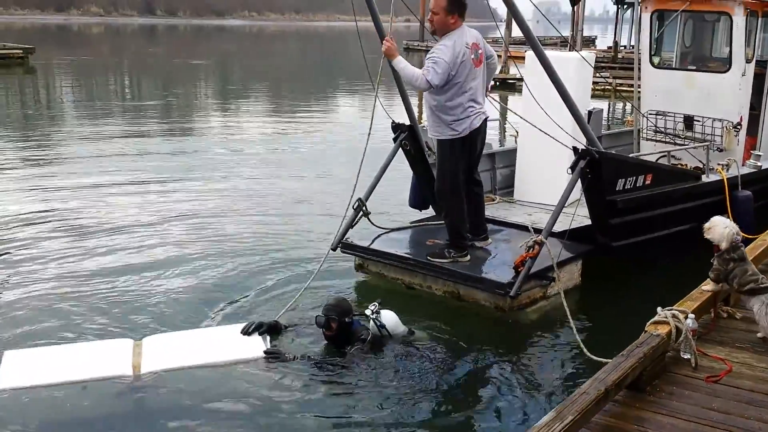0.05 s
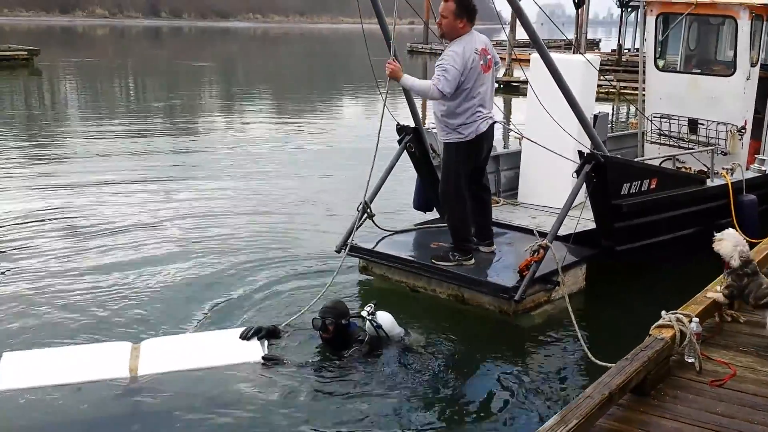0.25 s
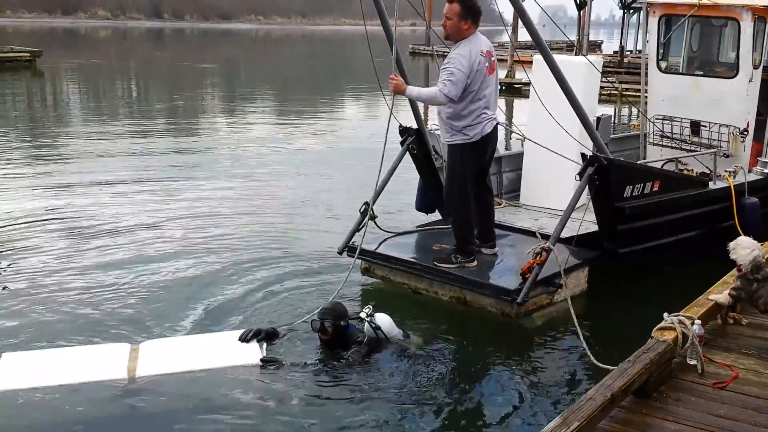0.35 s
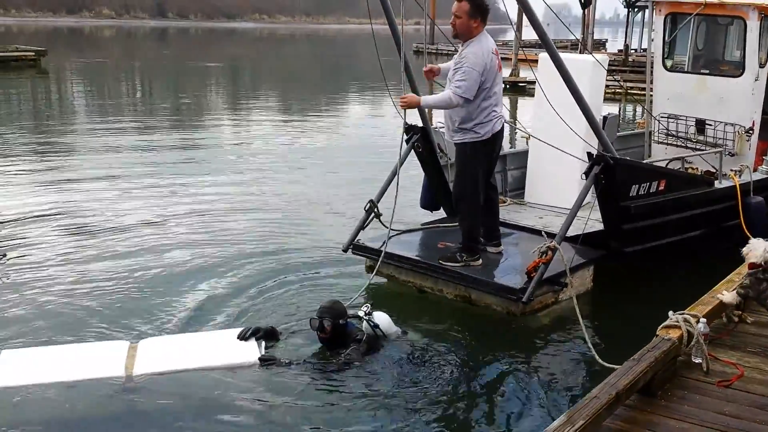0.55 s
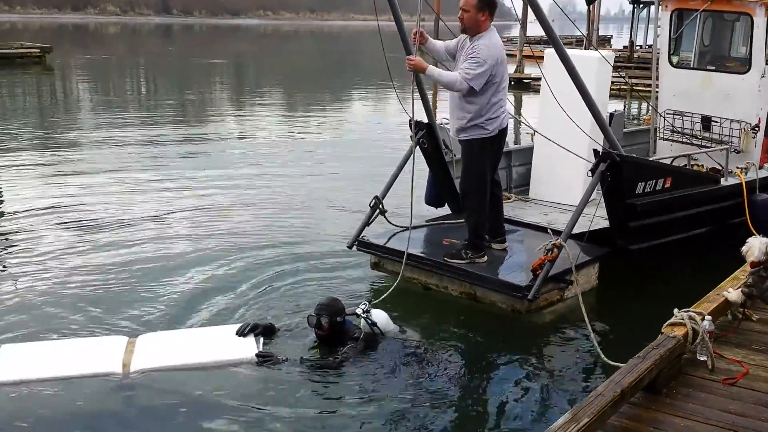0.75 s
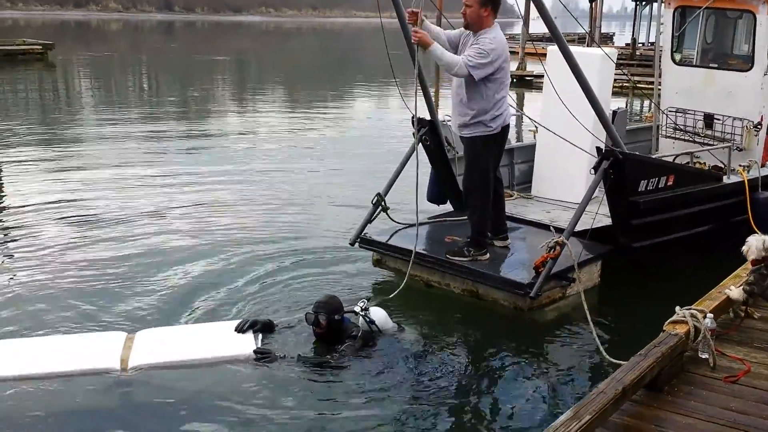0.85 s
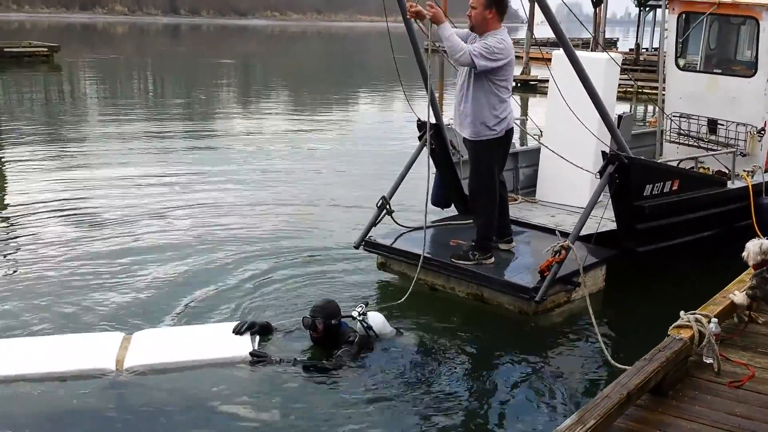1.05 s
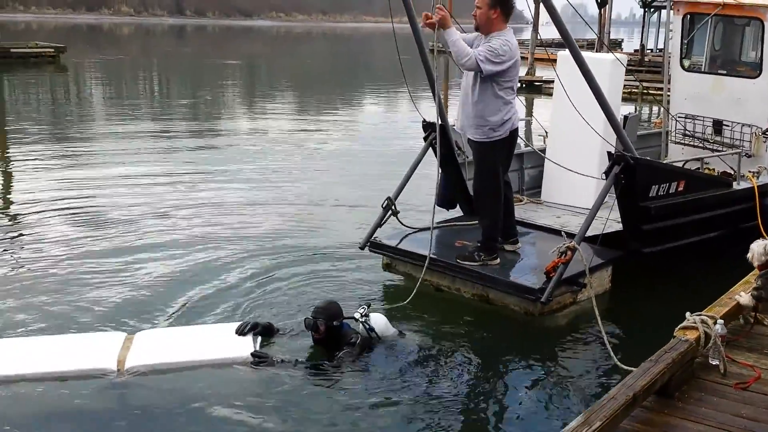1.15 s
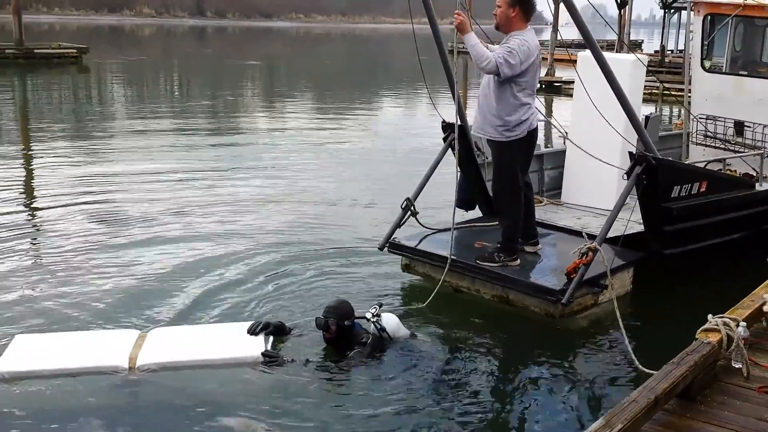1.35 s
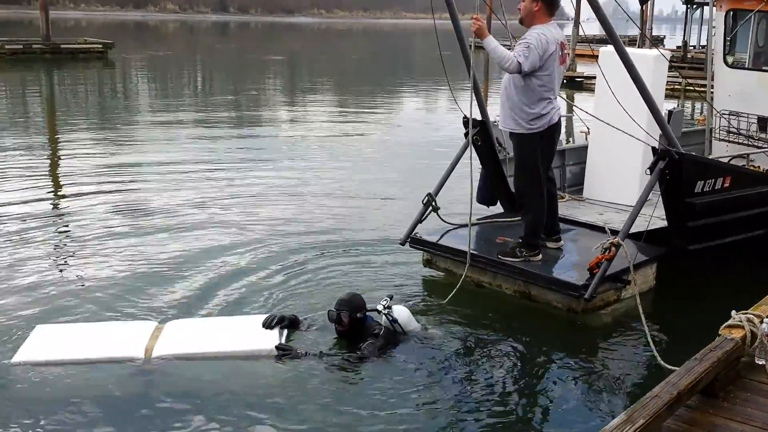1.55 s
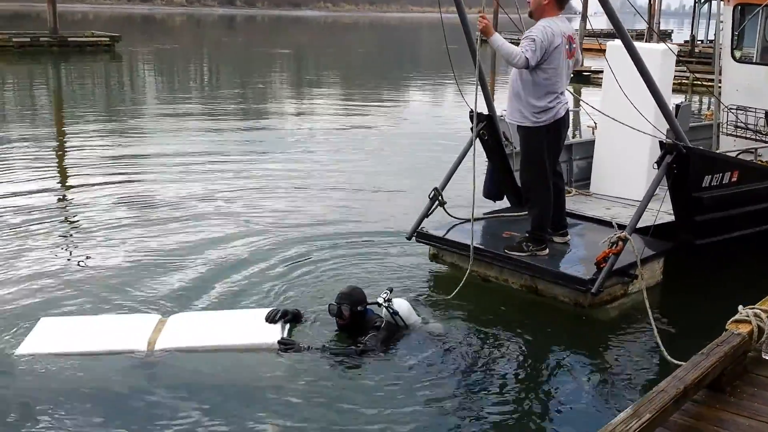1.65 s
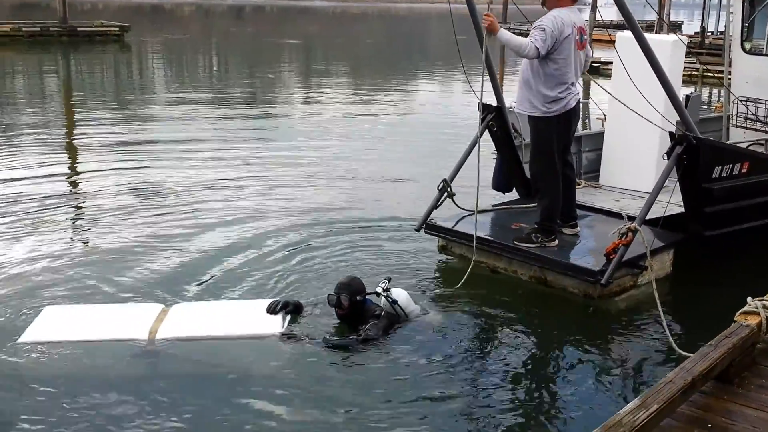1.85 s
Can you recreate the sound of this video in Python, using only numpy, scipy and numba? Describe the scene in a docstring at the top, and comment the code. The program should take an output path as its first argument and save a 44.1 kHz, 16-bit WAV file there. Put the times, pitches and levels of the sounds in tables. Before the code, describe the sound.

A small dog barks harshly close by at about 0.2 s, a short raspy yap that rises and falls, followed by hard echoes and a fading open-air tail. Around 0.75 to 1.0 s claws scrape, pads rub and planks thud softly, with tiny water plips. A second, slightly higher and rougher bark comes at 1.35 to 1.55 s, then light board thuds and a tick over quiet water wash and faint motor hum.

```python
"""A small dog gives two harsh barks on a wooden dock, close to the microphone.
Uneven throat pulses and rasp ring its chest, mouth and muzzle; boat hulls and the far side of the
marina throw the sound back as hard echoes and scatter. Claws scuff and pads rub the planks, the boards
thud and small fittings tick. Behind lie filtered-noise wash and fizz of water, two ringing plips,
a wavering motor hum and faint air on the microphone ports."""
import sys
import numpy as np
from scipy import signal
from scipy.fft import rfft, irfft
from scipy.io import wavfile
from scipy.ndimage import uniform_filter1d
from numba import njit

SR = 44100
rng = np.random.default_rng(int(sys.argv[2]) if len(sys.argv) > 2 else 0)


def unload_wav(signal):
    """Save mono or channel-first audio to the path in sys.argv[1] as 16-bit WAV at rate SR, clipped to [-1, 1]."""
    wavfile.write(
        sys.argv[1],
        SR,
        np.round(np.clip(np.atleast_2d(signal).T, -1, 1) * 32767).astype(np.int16),
    )


N = 83790

# All colour tables give the shape of a spectrum; its overall power is set apart from it.
# air on the microphone ports: (frequency [Hz], density [dB per Hz])
WIND_COLOUR = [(45, -17), (100, -15), (2000, -69)]
# wash of water and distant harbour: (frequency [Hz], density [dB per Hz])
HARBOUR_COLOUR = [(20, -30), (50, -13), (100, -3), (230, -3), (380, -8), (900, -19), (1700, -23.5),
                  (3200, -28.5), (7000, -27), (10000, -26.5), (14500, -50)]
# fizz of the water: (time [s], level [dB]), then (frequency [Hz], density [dB per Hz])
FIZZ = [(0, -49.5), (.13, -46.5), (.5, -54.5), (.72, -52), (1.05, -60), (1.28, -58), (1.7, -48.5),
        (1.9, -49.5)]
FIZZ_COLOUR = [(500, 12.5), (1200, 7), (2800, -1.5), (4200, 1), (5500, 7), (6800, 3.5), (8000, 3.5),
               (10000, -6), (14000, -14)]
# plips of water: (time [s], frequency [Hz], level before the rise and decay [dB])
PLIPS = [(0.7514, 988, -30.5), (0.789, 1748, -33)]
# thuds of the boards: (time [s], level before the rise and decay [dB], decay [s])
THUDS = [(.548, -41.5, .03), (.805, -29.5, 0.057), (.89, -47, 0.13), (1.018, -40.5, 0.071),
         (1.503, -31.5, 0.059), (1.575, -39, 0.11), (1.669, -34, 0.11), (1.775, -38, 0.02)]
# plank resonances: (frequency [Hz], width of each filter pass [Hz], relative level [dB])
BOARDS = [(124.6, 53, 9), (169.4, 53, 6), (202.4, 57, 0), (289, 160, -14), (521, 180, -6)]
# ticks of the fittings: (time [s], level before the rise and decay [dB], decay [s])
TICKS = [(.054, -35, 0.0016), (1.325, -39, 0.017), (1.347, -26.5, 0.0019), (1.819, -27.5, 0.0018)]
TICK_COLOUR = [(1000, 6), (4000, -5), (7000, 4.5), (10000, -1), (14000, -10)]  # (frequency [Hz], density [dB per Hz])
# claw scrapes: (time [s], level before the rise and decay [dB], decay [s])
CLAWS = [(.763, -36.5, 0.0074), (.7745, -32, 0.0063), (.783, -36.5, 0.016), (.810, -34.5, 0.007),
         (.826, -40.5, 0.019), (.857, -33, 0.0061), (.911, -35, 0.0061), (.932, -39, 0.017),
         (.963, -34, 0.014)]
CLAW_COLOUR = [(300, -46), (900, 5), (1350, -5), (1750, 5), (2300, -8), (3400, -3), (4200, 2.5),
               (5300, 3.5), (6600, -4.5), (8000, -1), (10000, -17), (14000, -51)]  # (frequency [Hz], density [dB per Hz])
# pads rubbing the planks: (time [s], level [dB])
SHUFFLE = [(.73, -61), (.76, -45), (.83, -37), (.95, -40), (1.03, -43.5), (1.12, -53.5), (1.25, -90)]
SHUFFLE_COLOUR = [(150, -49), (300, 8.5), (400, -12), (530, 3), (680, -2.5), (860, 1), (1150, -6.5),
                  (1750, -8), (2300, -16.5), (6000, -19.5), (14000, -45)]  # (frequency [Hz], density [dB per Hz])
# hard echoes off planks, hull and cabin: (delay [s], level [dB], left over right [dB])
ECHOES = [(.0047, -29, 13), (0.018, -11.5, 10.5), (0.03, -7, -5.5), (.075, -20, 8.5), (.108, -17.5, 2),
          (0.144, -19, 7.5)]
# scatter: (band centre [Hz], near level [dB], near t60 [s], far level [dB], far t60 [s])
MARINA = [(256, -5.5, 0.74, -12, 1.5), (885, -2, 0.51, -15.5, 1.57), (2320, -1, 0.37, -16.5, 1.44),
          (4700, -1, 0.06, -14.5, 2), (11500, -1, 0.092, -44, .4)]
# the barks: (time [s], pitch [Hz], level [dB], roughness [0-1], mouth resonance [Hz])
BARK_1 = [(.172, 225.2, -48, 0.1, 770), (.194, 279.9, -29, 0.25, 730), (.208, 384.5, -14.5, 0.36, 860),
          (.25, 459.6, -10, 0.37, 946), (.285, 450.9, -13, 0.63, 862), (.325, 380.1, -13.5, 0.7, 791),
          (.336, 410, -30, 0.82, 810), (.351, 438, -21, 0.65, 930), (.362, 338, -26, 0.4, 850)]
BARK_2 = [(1.318, 205.5, -51.5, 0.19, 880), (1.352, 280.3, -26.5, 0.19, 990),
          (1.363, 349.1, -23.5, 0.32, 973), (1.394, 458.8, -15, 0.86, 1008), (1.462, 526, -12, .7, 1083),
          (1.498, 494.7, -19, 0.9, 966), (1.516, 478.4, -19.5, 0.77, 890), (1.585, 471, -49, 0.68, 940)]
# upper muzzle resonances: (frequency [Hz], width of each filter pass [Hz], level [dB])
MUZZLE_1 = [(1106, 220, -13.5), (1382, 217, -6.5), (1970, 210, -10), (2290, 205, -6.5), (2870, 43, -18.5),
            (3210, 61, -25), (4440, 200, -25), (5350, 210, -24), (7230, 1900, -35), (11100, 1100, -41)]
MUZZLE_2 = [(1261, 380, -7), (1960, 410, -14), (2995, 295, -9), (3780, 320, -17.5), (6950, 3700, -25.5)]
# cavity over the tongue, sinking as the mouth resonance rises:
# (frequency at rest [Hz], width of each filter pass [Hz], level [dB], exponent of the fall)
TONGUE_1 = (2100, 280, -7, 0.34)
TONGUE_2 = (2600, 417, -8, 2)
# chest resonances: (frequency [Hz], width of each filter pass [Hz], relative level [dB])
CHEST = [(302, 233, -22.5), (468, 345, -22.5)]

WIND_DB, HARBOUR_DB = -58, -49
HUM_HZ, HUM_DB = 80.8, -52
PLIP_ATTACK_S, PLIP_DECAY_S = 0.00081, 0.0085
SPREAD_S = 0.0035  # rise of the scatter
DOG_PAN_DB, ROOM_PAN_DB = 1.5, 2.5  # left over right
TREBLE_PAN_DB, TREBLE_HZ = -4.5, 5060  # the highest rasp leans to the right port
LAG_1_S, LAG_2_S = 0.00011, 0.0002  # each bark reaches the right port this much later
JITTER, SHIMMER_DB, RASP_DB = .11, 7, 5  # at full roughness
RASP_SHARE = 0.18  # share of a cycle in which the rasp decays
FLUTTER_DB, FLUTTER_RATE = 10, 110  # at full roughness; wander steps per second
MOUTH_REST_HZ = 900
CLOSED_DB = 40  # lead of the chest while the jaws are shut
CLOSING_S, MUFFLE_DB = 0.089, -4  # closing jaws muffle the upper resonances
TOP_HZ = 14600


def undb(db):
    """Amplitude of a level in dB."""
    return 10 ** (np.asarray(db) / 20)


def unit(x):
    """Scale to an rms of 1."""
    return x / np.sqrt(np.mean(x ** 2))


def clock():
    """Time of every sample in seconds."""
    return np.arange(N) / SR


def curve(rows):
    """The columns of a table, joined by straight lines in time."""
    rows = np.array(rows, float)
    return [np.interp(clock(), rows[:, 0], column) for column in rows.T[1:]]


def walk(rate):
    """Random wander: normal draws at this rate per second, joined by straight lines."""
    steps = rng.standard_normal(4096)
    return np.interp(clock() * rate, np.arange(len(steps)), steps)


def colour(x, points):
    """Shape a sound by (frequency [Hz], density [dB]) points, keeping the power of white noise."""
    hz, db = np.array(points, float).T
    f = np.maximum(np.fft.rfftfreq(N, 1 / SR), 1)
    gain = unit(undb(np.interp(np.log(f), np.log(hz), db)))
    return irfft(rfft(x) * gain, N)


def stereo_noise(apart_hz):
    """Noise that is alike left and right in the bass and unrelated well above apart_hz."""
    f = np.fft.rfftfreq(N, 1 / SR)
    like = 1 / (1 + (f / apart_hz) ** 2)
    mid, side = rfft(rng.standard_normal((2, N)))
    mid = mid * np.sqrt((1 + like) / 2)
    side = side * np.sqrt((1 - like) / 2)
    return irfft(mid + side * np.array([[1], [-1]]), N)


def pan(db):
    """Left and right gains that differ by this many dB."""
    return undb(np.array([[db], [-db]]) / 2)


def bursts(rows, attack_s):
    """Envelope of quick rises with exponential decays."""
    envelope = 0
    for start, db, decay in rows:
        age = np.maximum(clock() - start, 0)
        envelope = envelope + undb(db) * (1 - np.exp(-age / attack_s)) * np.exp(-age / decay)
    return envelope


@njit
def svf(x, hz, width):
    """Band-pass (state-variable filter) with a moving centre, gain 1 there."""
    y, band, low = np.empty(len(x)), 0., 0.
    for i in range(len(x)):
        g, k = np.tan(np.pi * hz[i] / SR), width / hz[i]
        v = (band + g * (x[i] + 1e-18 - low)) / (1 + g * (g + k))
        band, low, y[i] = 2 * v - band, low + 2 * g * v, k * v
    return y


def resonate(x, hz, width):
    """A steep resonance: the band-pass applied twice."""
    hz = hz * np.ones(N)
    once = svf(x, hz, float(width))
    return svf(once, hz, float(width))


def body(x, modes):
    """A solid body or cavity: resonances side by side."""
    return sum(undb(db) * resonate(x, hz, width) for hz, width, db in modes)


def breeze():
    """Air on the ports: low noise, unrelated left and right."""
    return undb(WIND_DB) * colour(rng.standard_normal((2, N)), WIND_COLOUR)


def harbour():
    """Wash and fizz of water as wavering noise, with a far motor as one wavering sine."""
    wash = colour(stereo_noise(apart_hz=650), HARBOUR_COLOUR) * undb(HARBOUR_DB + 0.5 * walk(11.8))
    fizz_db = curve(FIZZ)[0] + 2 * walk(99) + 2.7 * walk(1200)
    fizz = colour(stereo_noise(apart_hz=1470) * undb(fizz_db), FIZZ_COLOUR)
    hum_hz = HUM_HZ * (1 + 0.015 * walk(3.13))
    hum = np.sqrt(2) * np.sin(2 * np.pi * np.cumsum(hum_hz) / SR)
    return wash + fizz + hum * undb(HUM_DB + 0.73 * walk(5.8))


def plips():
    """Bubbles ring briefly as decaying sines where the water slaps the dock."""
    total = 0
    for start, hz, db in PLIPS:
        tone = np.sin(2 * np.pi * hz * (clock() - start))
        total = total + tone * bursts([(start, db, PLIP_DECAY_S)], attack_s=PLIP_ATTACK_S)
    return total


def dock():
    """Noise bursts thud in the low resonances of loaded planks; shorter ones tick in the fittings."""
    push = rng.standard_normal(N)
    # measured against a steady push, so that the resonances do not change the level
    thuds = body(push * bursts(THUDS, attack_s=0.0064), BOARDS) / np.std(body(push, BOARDS))
    ticks = colour(stereo_noise(apart_hz=2500) * bursts(TICKS, attack_s=0.0013), TICK_COLOUR)
    return thuds + ticks


def paws():
    """Claws catch on the grain in short gritty scrapes while the pads rub along the wood."""
    grit = undb(1.9 * walk(490))
    scrapes = stereo_noise(apart_hz=2460) * bursts(CLAWS, attack_s=0.0016) * grit
    rub = stereo_noise(apart_hz=1140) * undb(curve(SHUFFLE)[0] + 2.7 * walk(90.7))
    return pan(db=-0.5) * colour(scrapes, CLAW_COLOUR) + colour(rub, SHUFFLE_COLOUR)


def marina(x, lag_s):
    """The direct sound reaches the left port first; hard echoes and a near and a far scatter follow."""
    t, f = clock(), np.fft.rfftfreq(N, 1 / SR)
    lags = np.array([[0], [lag_s]])
    ports = np.exp(-2j * np.pi * f * lags)
    paths = pan(DOG_PAN_DB) * ports
    for delay, db, side_db in ECHOES:
        arrival = delay + lags * rng.random()
        paths = paths + undb(db) * pan(side_db) * np.exp(-2j * np.pi * f * arrival)
    response = irfft(paths, N)
    scatter = ports * rfft(stereo_noise(apart_hz=1400))
    centres = np.log([row[0] for row in MARINA])
    # each band fades into its neighbours between their centres
    for share, (_, near_db, near_t60, far_db, far_t60) in zip(np.eye(len(MARINA)), MARINA):
        band = irfft(scatter * np.interp(np.log(f + 1), centres, share), N)
        for db, t60 in (near_db, near_t60), (far_db, far_t60):
            fade = (1 - np.exp(-t / SPREAD_S)) * np.exp(-np.log(1000) * t / t60)
            response = response + pan(ROOM_PAN_DB) * undb(db) * band * unit(fade) / np.sqrt(N)
    heard = signal.fftconvolve(x[None], response, axes=1)[:, :N]
    treble = f ** 2 / (f ** 2 + TREBLE_HZ ** 2)
    return irfft(rfft(heard) * pan(TREBLE_PAN_DB) ** treble, N)


@njit
def folds(hz, jitter, shimmer, chance):
    """One pulse per cycle of the vocal folds, each with its own length and size; also the phase."""
    pulses, phase, p, k = np.zeros(len(hz) + 1), np.empty(len(hz)), 0., 0
    for i in range(len(hz)):
        step = hz[i] * np.exp(jitter[i] * chance[k, 0]) / SR
        p += step
        if p >= 1:
            p, k = p - 1, k + 1
            # mean power stays the same at any pitch and shimmer
            size = np.exp(shimmer[i] * chance[k, 1] - shimmer[i] ** 2) / np.sqrt(step)
            # share the pulse between two samples to place it finely
            pulses[i] += size * p / step
            pulses[i + 1] += size * (1 - p / step)
        phase[i] = p
    return pulses[:-1], phase


def bell(age, width):
    """1 up to age zero, then a Gaussian fall."""
    return np.exp(-(np.maximum(age, 0) / width) ** 2 / 2)


def bark(gesture, muzzle, tongue, mouth_width, low_hz, top_hz, chest_db, jaw_s):
    """Ragged pulses and rasp ring the chest, which leads at first, then mouth, tongue cavity and muzzle."""
    t, start, end = clock(), gesture[0][0], gesture[-1][0]
    hz, db, rough, mouth_hz = curve(gesture)
    chance = rng.standard_normal((N // 20, 2))
    pulses, phase = folds(hz, JITTER * rough, np.log(undb(SHIMMER_DB)) * rough, chance)
    rasp = unit(np.exp(-phase / RASP_SHARE) * rng.standard_normal(N))
    flutter = undb(FLUTTER_DB * rough * walk(FLUTTER_RATE))
    air = (pulses + undb(RASP_DB) * rough * rasp) * flutter

    still_shut, closing = bell(t - start, jaw_s), bell(end - t, CLOSING_S)
    tongue_rest_hz, tongue_width, tongue_db, pull = tongue
    tongue_hz = tongue_rest_hz * (MOUTH_REST_HZ / mouth_hz) ** pull
    upper = body(air, muzzle) + undb(tongue_db) * resonate(air, tongue_hz, tongue_width)
    mouth = resonate(air, mouth_hz, mouth_width) + undb(MUFFLE_DB * closing) * upper
    # the small mouth radiates little below low_hz; its rasp dies away above top_hz
    radiation = signal.butter(10, [low_hz, top_hz], "bandpass", fs=SR, output="sos")
    chest = undb(chest_db + CLOSED_DB * still_shut) * body(air, CHEST)
    voice = signal.sosfilt(radiation, mouth) + chest
    # even out the level over 700 samples, then let the gesture set it
    voice = voice / np.sqrt(uniform_filter1d(voice ** 2, size=700) + 1e-12)
    return voice * undb(db) * (t > start) * (t < end)


def scene():
    """Two barks in the marina, the dog's feet on the dock, the water and a light breeze."""
    background = breeze() + harbour() + plips() + dock() + paws()
    first = bark(BARK_1, MUZZLE_1, TONGUE_1, mouth_width=281, low_hz=724, top_hz=11700,
                 chest_db=-11.5, jaw_s=0.027)
    second = bark(BARK_2, MUZZLE_2, TONGUE_2, mouth_width=320, low_hz=789, top_hz=10470,
                  chest_db=-1, jaw_s=0.032)
    return background + marina(first, LAG_1_S) + marina(second, LAG_2_S)


def record(dry):
    """The microphone chain rounds the highest peaks and cuts the top."""
    rounded = dry / (1 + dry ** 6) ** (1 / 6)
    low_pass = signal.ellip(8, .2, 70, TOP_HZ, fs=SR, output="sos")
    return signal.sosfilt(low_pass, rounded)


dry = scene()
out = record(dry)
unload_wav(out)
```